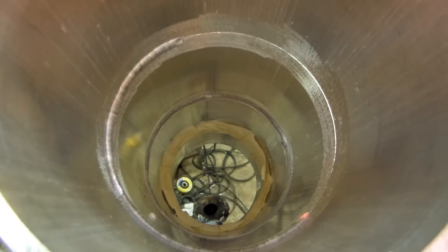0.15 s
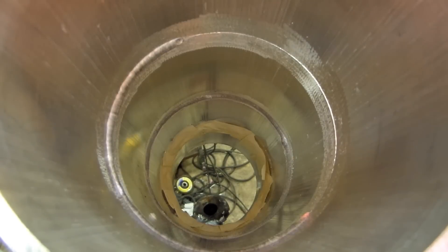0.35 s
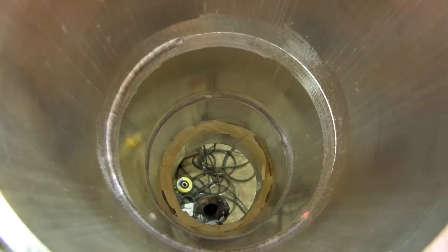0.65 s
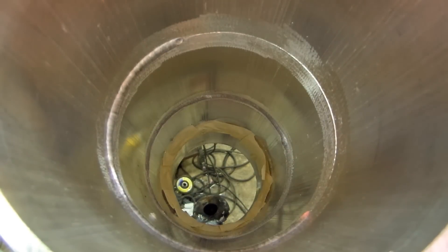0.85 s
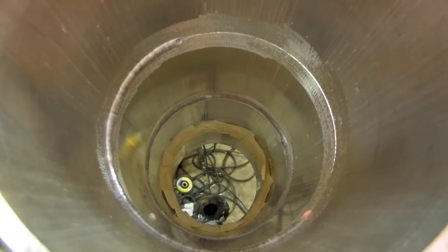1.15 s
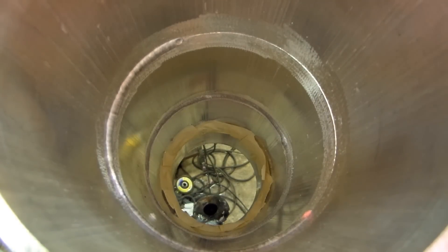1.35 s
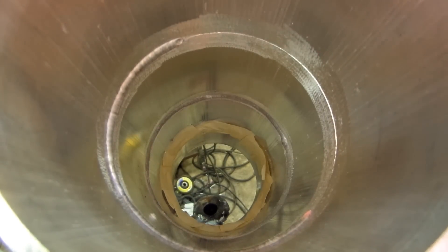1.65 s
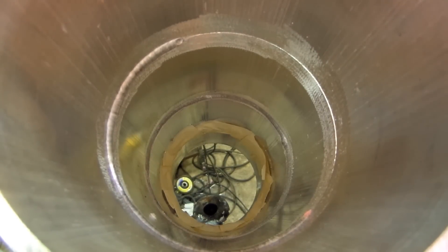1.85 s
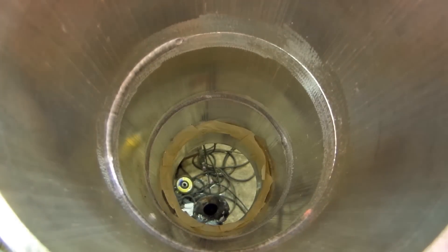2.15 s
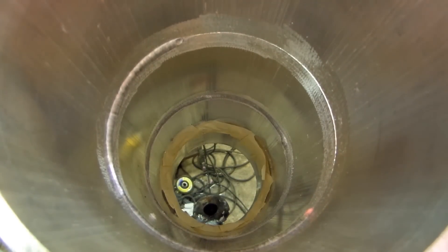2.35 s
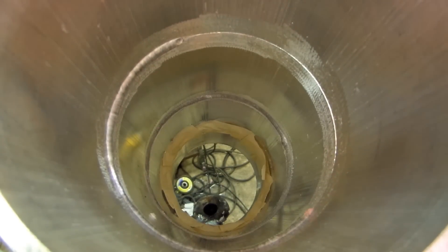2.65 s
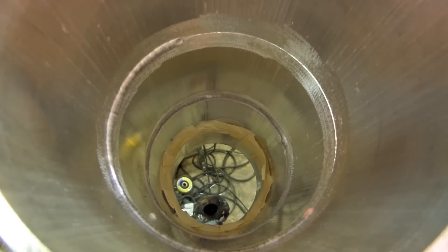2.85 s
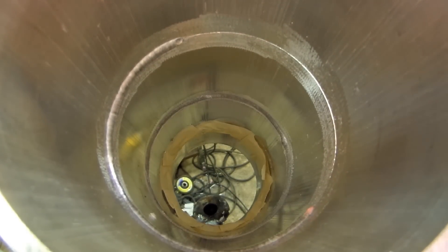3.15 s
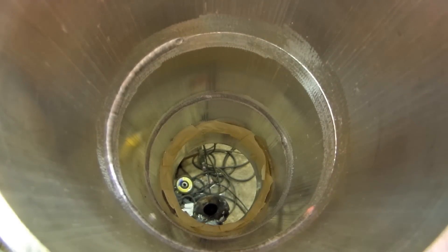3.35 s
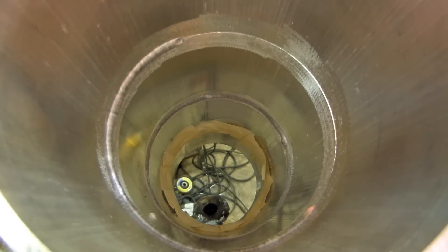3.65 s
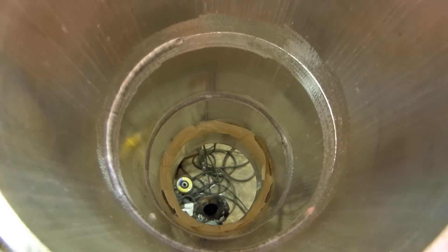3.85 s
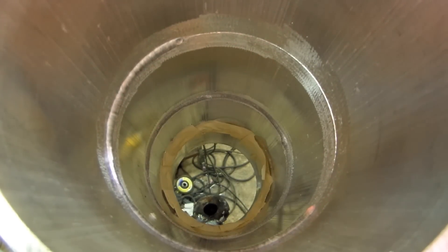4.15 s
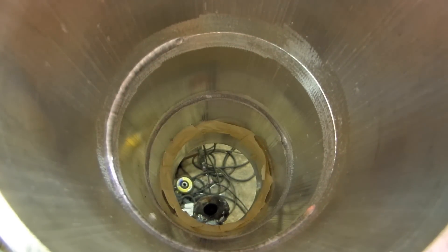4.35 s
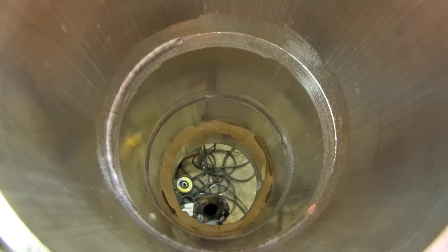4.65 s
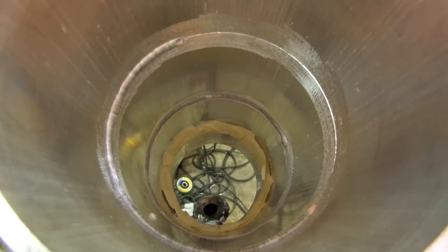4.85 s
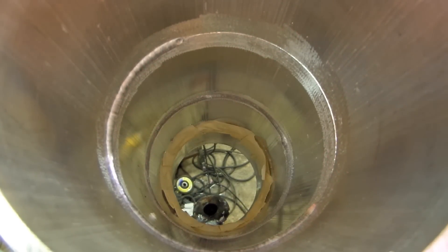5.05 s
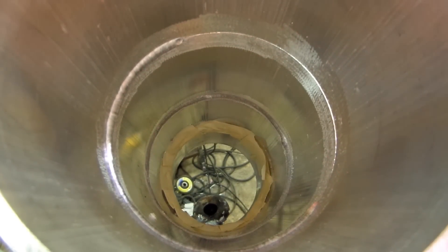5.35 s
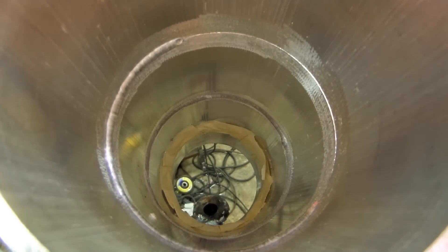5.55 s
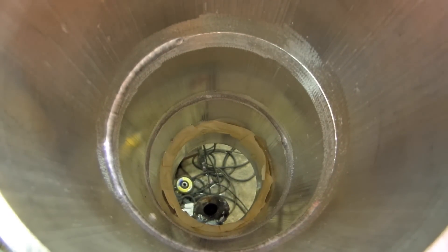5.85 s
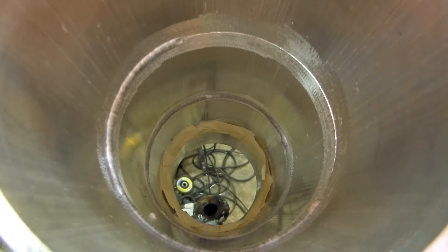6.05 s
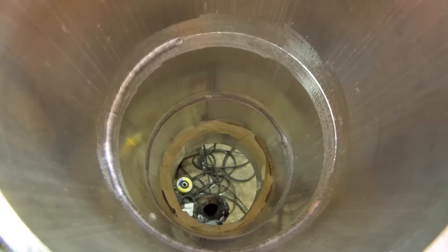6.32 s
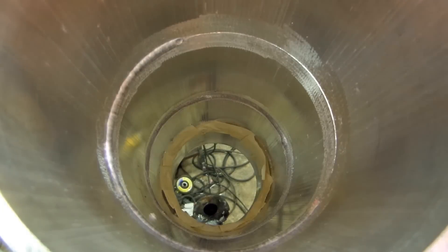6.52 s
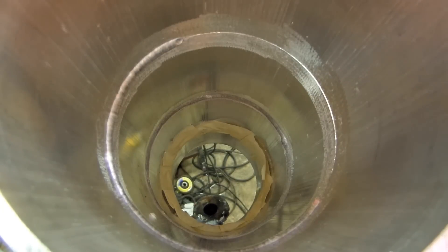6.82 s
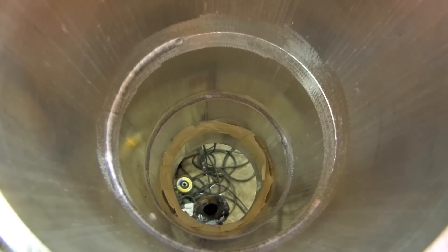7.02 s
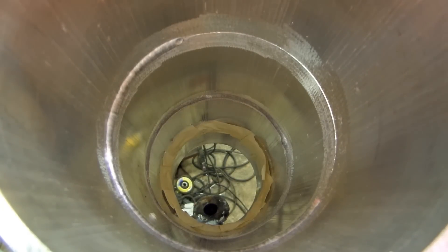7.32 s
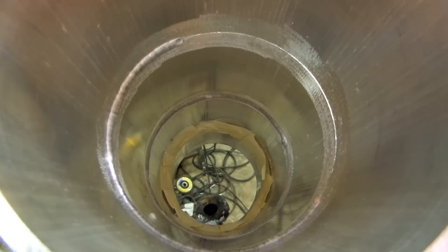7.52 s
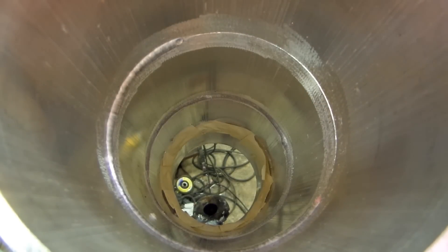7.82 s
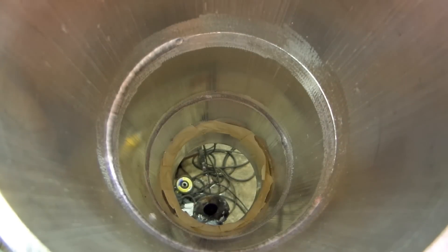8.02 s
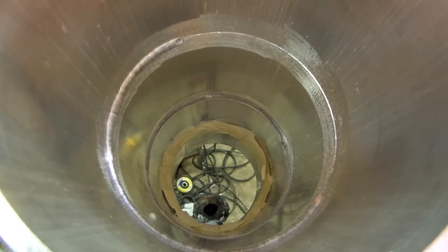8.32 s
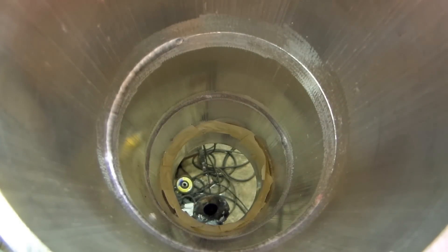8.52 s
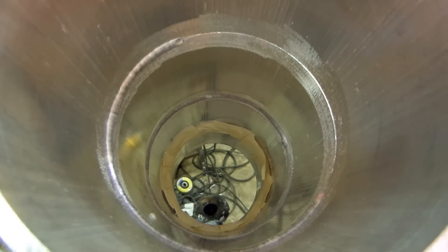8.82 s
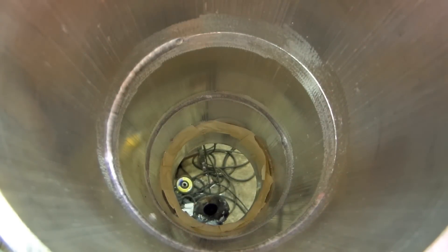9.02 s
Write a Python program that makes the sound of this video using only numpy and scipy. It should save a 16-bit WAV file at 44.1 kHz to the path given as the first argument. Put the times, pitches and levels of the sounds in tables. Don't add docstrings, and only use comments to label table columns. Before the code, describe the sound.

Close, mono sound of a metal bowl or tube buzzing on a shaker: knocks and dull thumps too fast to separate fuse into a nasal drone. Thin, tinny rattling and ringing sit on top, stuttering briefly at irregular moments. The timbre jumps a little near four seconds and again just after five, becoming tighter towards the end. Quiet mains and fan hum and steady hiss fill the enclosed room.

```python
import sys
import numpy as np
from scipy import signal
from scipy.fft import rfft, irfft, next_fast_len
from scipy.io import wavfile
from scipy.ndimage import uniform_filter1d

SR = 44100
rng = np.random.default_rng(int(sys.argv[2]) if len(sys.argv) > 2 else 0)


def elevation(decibels):
    levels = np.asarray(decibels, float)
    return 10 ** (levels / 20)


def persist_wave(psi):
    counts = np.round(np.clip(psi, -1, 1) * 32767).astype(np.int16)
    wavfile.write(sys.argv[1], SR, np.atleast_2d(counts).T)


N = 404819

CYCLE_HZ, FIRST_CYCLE_S = 90.8296, .019865

# start_s, level_db
DRIVE_LOAD = [(0.0, -35), (0.48, -35), (1.41, -35.5), (1.79, -34), (2.2, -34), (2.27, -34.5), (3.65, -35),
              (3.81, -34.5), (4.1, -35), (4.75, -34.5), (5.5, -32.5), (5.67, -33), (6.11, -33.5),
              (6.35, -32.5), (6.62, -33.5), (8.05, -33), (8.2, -32), (9.18, -32)]
LIGHT_DB, HEAVY_DB = -34.5, -29.5

# multiple_of_cycle_rate, level_db (relative to LIGHT_DB)
LIGHT_ORDERS = [(1, -26), (2, -2), (3, -3), (4, -6), (5, -1), (6, -5.5), (7, 1.5), (8, -3), (9, -4.5),
                (10, -5.5), (11, -16.5), (12, -36.5), (13, -13.5), (14, -11.5), (15, -19.5), (16, -16),
                (17, -29), (18, -53), (19, -28), (20, -40), (21, -15), (22, -54), (23, -10), (24, -7),
                (25, -18.5), (26, -16), (27, -36), (28, -17), (29, -13.5), (30, -12), (31, -7), (32, -16),
                (33, -11.5), (34, -20), (35, -26), (36, -45)]
# multiple_of_cycle_rate, level_db (relative to HEAVY_DB)
HEAVY_ORDERS = [(1, -36), (2, -4.5), (3, -4.5), (4, -4.5), (5, 0.5), (6, -11), (7, 5), (8, -0.5),
                (9, -13.5), (10, -2), (11, -13), (12, -62), (13, -9.5), (14, -12.5), (15, -11), (16, -13),
                (17, -19), (18, -47), (19, -32), (20, -27), (21, -21), (22, -59), (23, -14), (24, -11),
                (25, -19), (26, -20), (27, -42), (28, -27), (29, -16.5), (30, -28), (31, -12), (32, -24),
                (33, -23), (34, -9), (35, -26), (36, -46)]

# at_ms, width_ms, push (signed, relative)
STROKES = [
    (1.6, .34, 2.8),
    (1.9, .3, -2.1),
    (5.25, .22, -1.1),
    (5.7, .28, 2.6),
    (6.55, .2, -.5),
]

# pitch_hz, width_hz, struck_ms, push (signed, relative)
WALL_MODES = [
    (2160, 68, .69, .8),
    (2800, 65, .9, 1),
    (2140, 56, 5.6, -.6),
    (2840, 96, 5.7, -.3),
]

# pitch_hz, length_ms, polarity (sign), loose_db, seated_db, shifted_db (extra)
CHATTER_MODES = [(3740, 2.9, -1, -50, -81, 8), (4233, 1.337, 1, -38.5, -43, 1),
                 (5040, 1.14, 1, -41, -37, -1.5), (5440, 3.13, -1, -41.5, -36, -5),
                 (6238, 2.364, 1, -42.5, -47.5, -2), (6740, 1.93, -1, -46, -43, 5),
                 (7330, 1.91, 1, -42, -38.5, -1.5), (7957, 1.46, -1, -35, -41, 1),
                 (8790, 1.09, 1, -44, -44.5, 1), (9175, 1.32, -1, -43.5, -37.5, 2.5)]
TOUCH_MS = 1.75
PIVOT_HZ, FADE_DB_PER_MS_KHZ = 5370, 1.7

# start_s, seated (0-1), shifted sideways (0-1)
SEATING = [
    (0, 0, 0.5),
    (4.05, 0.02, 0.2),
    (4.12, 0.3, 1),
    (5.25, 0.45, 1),
    (5.3, 0.5, 0.54),
    (7.8, .7, 0.35),
    (9.2, 1, 0),
]

# pitch_hz, width_hz, loose_db, seated_db, shifted_db (extra)
RINGING_MODES = [(3710, 21, -50.5, -48.5, 0.5), (4580, 91, -44, -50.5, -0.5), (4930, 100, -66, -45, 0),
                 (5584, 130, -48, -64, 1), (6160, 150, -46, -45.5, 0), (7220, 126, -47, -44.5, -3),
                 (8170, 240, -44, -46, 0)]

# pitch_hz, level_db (rms)
TONES = [(120.1, -52), (283.4, -48), (133, -62), (297.1, -64), (566.8, -64), (600.9, -63), (850.2, -65)]

# pitch_hz, level_db (per Hz)
HISS_SPECTRUM = [(25, -11), (80, -7), (130, -5), (300, -5.5), (650, -5), (1000, -7), (1700, -12.5),
                 (2150, -5), (2450, -10.5), (2850, -4.5), (3600, -11.5), (4700, -4.5), (5600, -10),
                 (9600, -12.5)]
HISS_DB = -36.5

# start_s, level_db
CONTACT_FORCE = [(0, -33), (.4, -32), (1.4, -31.5), (2.05, -31.5), (2.2, -33), (2.7, -31), (3.1, -33.5),
                 (3.95, -31.5), (4.1, -34), (4.7, -33.5), (5.15, -32.5), (5.3, -35), (5.9, -32.5),
                 (6.5, -35), (6.68, -32), (7.5, -34.5), (8.0, -33), (8.4, -34)]
# start_s, change_db
MISSES = [(.567, -7), (.732, -3), (.953, -6), (1.525, -8.5), (1.767, -7), (2.285, -4), (2.483, -5),
          (2.681, -12), (2.879, -7.5), (2.923, -2), (3.716, -7), (3.815, -5), (4.773, -6.5), (4.971, -5),
          (4.993, -6.5), (5.015, -4), (5.158, -4), (5.654, -3.5), (6.072, -6), (6.248, -5.5), (6.513, -3),
          (6.612, -5), (6.766, -3), (6.854, -4), (7.118, -5.5), (7.162, -1), (7.448, -3.5), (7.569, -3),
          (7.988, -11), (8.99, -3)]
# start_s, length_s, change_db
LAPSES = [(.92, .022, -4), (1.548, 0.068, -7), (2.142, .022, -4), (2.186, .022, -4), (2.616, 0.055, -8),
          (3.045, .022, -5), (3.749, .022, -6), (5.268, .022, -3.5), (5.599, .022, -4), (5.742, 0.081, -4),
          (6.546, .022, -4)]
# start_s, change_db
ODD_THUMPS = [(1.233, -4), (5.926, -1.5), (6.113, -2), (6.124, -1), (6.157, -2), (7.99, -2)]
ODD_THUMP_S = .005

SPLIT_HZ, COPY_UP_HZ = 9646, 6201.6
TOP_DB, TOP_RISE_DB_PER_S, START_LOSS_DB, SETTLE_S = -41, .18, -1.5, 0.45
FLICKER_DB, FLICKERS_PER_S = 12, 40
# pitch_hz, level_db
TOP_LOOSE = [(9650, -5.5), (10600, 2.5), (11000, -0.5), (11350, -7), (12100, -3), (12800, -4), (13400, 2),
             (15800, -3.5)]
# pitch_hz, level_db
TOP_SEATED = [(9650, -6), (10600, -1), (11500, -2), (12300, -2), (12800, -6), (13400, 3), (14400, 5),
              (15800, -5)]
# at_ms, width_ms, loose_db, seated_db
SNAP = [
    (1.08, .3, 2, 3.5),
    (2.5, .5, -4, -4),
]


def evened(x):
    return x / np.sqrt(np.mean(x ** 2) + 1e-20)


def along(rows, t):
    s, *columns = np.transpose(rows)
    return [np.interp(t, s, c) for c in columns]


def read(points, hz):
    f, value = np.transpose(points)
    return np.interp(np.log(hz + 1), np.log(f + 1), value)


def ring(x, hz, width):
    r = np.exp(-np.pi * width / SR)
    return signal.lfilter([1 - r, 0, r - 1], [1, -2 * r * np.cos(2 * np.pi * hz / SR), r * r], x)


def turns():
    return (np.arange(N) / SR - FIRST_CYCLE_S) * CYCLE_HZ


def weak_db(t):
    db = np.zeros(len(t))
    single = [(s, 1 / CYCLE_HZ, loss_db) for s, loss_db in MISSES]
    for s, length, loss_db in single + LAPSES:
        db[np.searchsorted(t, s):np.searchsorted(t, s + length)] += loss_db
    return db


def contact_db(t):
    return along(CONTACT_FORCE, t)[0] + weak_db(t)


def stroke_phase(hz):
    def late(ms):
        return np.exp(-2j * np.pi * hz * ms / 1000)

    pushes = sum(p * np.exp(-.5 * (2 * np.pi * hz * w / 1000) ** 2) * late(ms) for ms, w, p in STROKES)
    walls = sum(-1j * p * w / (w + 1j * (hz - f)) * late(ms) for f, w, ms, p in WALL_MODES)
    return np.angle(pushes + walls)


def body(wobble_db=.5, sway_db=.5, sways_per_s=8, force_share=0.7):
    out, turn = np.zeros(N), turns()
    t, slow_turn = np.arange(0, N, 32) / SR, turn[::32]
    seventh_db, = along(DRIVE_LOAD, t)
    force_db = uniform_filter1d(contact_db(t), size=6)
    load = (seventh_db - LIGHT_DB) / (HEAVY_DB - LIGHT_DB)
    order, light_db = np.transpose(LIGHT_ORDERS)
    heavy_db = np.transpose(HEAVY_ORDERS)[1]
    wobble = rng.standard_normal((len(order), 900))
    sway = np.interp(slow_turn * sways_per_s / CYCLE_HZ, np.arange(200), rng.standard_normal(200))
    odd_db = sum(db * np.exp(-((t - s) / ODD_THUMP_S) ** 2) for s, db in ODD_THUMPS)
    phases = stroke_phase(order * CYCLE_HZ)
    for k, light, heavy, phase, w in zip(order, light_db, heavy_db, phases, wobble):
        db = (LIGHT_DB + light) * (1 - load) + (HEAVY_DB + heavy) * load
        db += wobble_db * np.interp(slow_turn, np.arange(len(w)), w) + sway_db * sway
        db += force_share * (k > 20) * (force_db - force_db.mean())
        db += (k <= 10) * odd_db
        level = np.interp(turn, slow_turn, np.sqrt(2) * elevation(db))
        out += level * np.cos(2 * np.pi * k * turn + phase)
    return out


def chatter(force_db=0.67, mode_db=0.7, slip=0.046, edge_ms=0.12, trim_db=-.5):
    middle = FIRST_CYCLE_S + np.arange(-1, int(turns()[-1])) / CYCLE_HZ + TOUCH_MS / 1000
    at = np.floor(middle * SR).astype(int)[:, None] + np.arange(-64, 64)
    ms = 1000 * (at / SR - middle[:, None])
    luck = rng.standard_normal((len(middle), 1 + 2 * len(CHATTER_MODES)))
    force = elevation(contact_db(middle) + force_db * luck[:, 0])
    seated, shifted = along(SEATING, middle)
    grain = np.zeros(ms.shape)
    for k, (hz, length, polarity, loose_db, seated_db, shift_db) in enumerate(CHATTER_MODES):
        db = loose_db + (seated_db - loose_db) * seated + shift_db * shifted
        size = elevation(db + mode_db * luck[:, 2 * k + 1])
        touch = np.clip((length / 2 - abs(ms)) / edge_ms + .5, 0, 1) / np.sqrt(length)
        touch *= elevation(-FADE_DB_PER_MS_KHZ * ms * (hz - PIVOT_HZ) / 1000)
        angle = 2 * np.pi * hz * ms / 1000 + slip * luck[:, 2 * k + 2, None]
        grain += polarity * size[:, None] * touch * np.cos(angle)
    energy = abs(uniform_filter1d((grain ** 2).sum(axis=1), size=21))
    grain /= np.sqrt(energy * CYCLE_HZ / SR + 1e-20)[:, None]
    out, blows = np.zeros(N + 128), np.zeros(N + 128)
    out[at] = elevation(trim_db) * force[:, None] * grain
    blows[at[:, 64]] = force
    out, blows = out[:N], blows[:N]
    seated, shifted = along(SEATING, np.arange(N) / SR)
    for hz, width, loose_db, seated_db, shift_db in RINGING_MODES:
        level = elevation(loose_db + (seated_db - loose_db) * seated + shift_db * shifted)
        out += level * evened(ring(blows, hz, width))
    return out


def hiss(patchy_db=2.0, puff=0.27, fade_turns=0.85, above_hz=3000, force_share=0.38, seated_db=-0.5):
    frames, hz = N // 256 + 5, np.fft.rfftfreq(1024, 1 / SR)
    a, b, patches = rng.standard_normal((frames, 513, 3)).T
    patches = uniform_filter1d(uniform_filter1d(patches, size=10, axis=0), size=12, axis=1)
    z = (a + 1j * b) * elevation(read(HISS_SPECTRUM, hz)[:, None] + patchy_db * evened(patches))
    z /= np.sqrt(np.mean(abs(z) ** 2))
    low, high = (signal.istft(z * part[:, None], nperseg=1024, noverlap=768)[1][:N]
                 for part in (hz < above_hz, hz >= above_hz))
    since_knock = (turns() - (TOUCH_MS - 1) * CYCLE_HZ / 1000) % 1
    swell = evened(1 - puff + puff * np.exp(-since_knock / fade_turns))
    t = np.arange(N) / SR
    force_db = uniform_filter1d(contact_db(t), size=200)
    seated = along(SEATING, t)[0]
    swell *= elevation(force_share * (force_db - force_db.mean()) + seated_db * seated)
    return elevation(HISS_DB) * evened(low + high * swell)


def tones(waver_db=-1.0):
    t, out = np.arange(N) / SR, np.zeros(N)
    slow = rng.standard_normal((len(TONES), 40))
    for (hz, db), w in zip(TONES, slow):
        level = elevation(db + waver_db * np.interp(t * 4, np.arange(len(w)), w))
        out += np.sqrt(2) * level * np.sin(2 * np.pi * hz * t)
    return out


def scene():
    return (body() + chatter() + hiss() + tones())[None]


def band_limit(x):
    return signal.sosfilt(signal.butter(12, 16080, fs=SR, output="sos"), x)


def record(dry, flatten=1.0, puff=0.48, fill=0.98, hollow_hz=12300, hollow_width=900, slip_share=0.45):
    size = next_fast_len(N)
    hz, t, z = np.fft.rfftfreq(size, 1 / SR), np.arange(N) / SR, rfft(dry[0], size)
    source = z * ((hz > SPLIT_HZ - COPY_UP_HZ) & (hz < SPLIT_HZ))
    envelope = abs(uniform_filter1d(abs(z) ** 2, size=3000)) + 1e-9
    band = signal.hilbert(irfft(source / envelope ** (flatten / 2), size))[:N]
    noise = (fill + puff * evened(uniform_filter1d(abs(band), size=60))) * rng.standard_normal(N)
    copy = evened((band * np.exp(2j * np.pi * COPY_UP_HZ * t)).real)

    seated = np.pad(along(SEATING, t)[0], (0, size - N), "edge")
    seated = np.clip(uniform_filter1d(seated, size=20000), 0, 1)
    ms = turns() % 1 / CYCLE_HZ * 1000
    snap_db = sum((loose_db + (seated_db - loose_db) * seated[:N]) * np.exp(-((ms - at) / w) ** 2)
                  for at, w, loose_db, seated_db in SNAP)
    top = rfft(elevation(snap_db) * (copy + noise), size)
    top *= (hz > SPLIT_HZ) * (hz < SPLIT_HZ + COPY_UP_HZ)
    loose, tight = (irfft(top * elevation(read(colour, hz)), size) for colour in (TOP_LOOSE, TOP_SEATED))
    top = rfft((1 - seated) * loose + seated * tight)

    start = np.exp(-t / SETTLE_S)
    flicker = np.interp(t * FLICKERS_PER_S, np.arange(1000), rng.standard_normal(1000))
    hollow_db = FLICKER_DB * flicker * start
    hollow = irfft(top * np.exp(-abs((hz - hollow_hz) / hollow_width) ** 4), size)[:N]
    top = irfft(top, size)[:N] + (elevation(np.minimum(hollow_db, 0)) - 1) * hollow

    top /= np.sqrt(abs(uniform_filter1d(top ** 2, size=9000)) + 1e-20)
    level_db = TOP_DB + TOP_RISE_DB_PER_S * t + START_LOSS_DB * start
    top *= elevation(level_db + slip_share * uniform_filter1d(weak_db(t), size=200))
    kept = irfft(z * (hz < SPLIT_HZ), size)[:N]
    return band_limit((kept + top)[None])


dry = scene()
out = record(dry)
persist_wave(out)
```